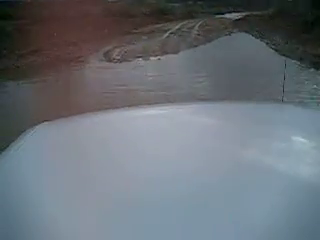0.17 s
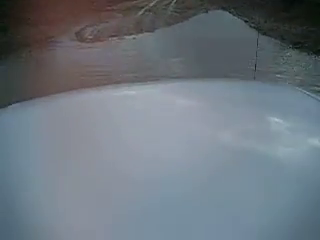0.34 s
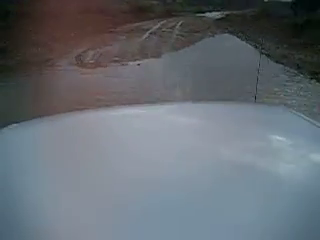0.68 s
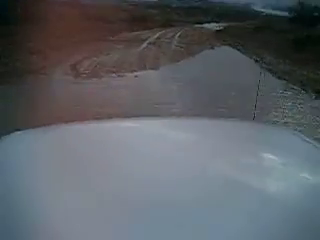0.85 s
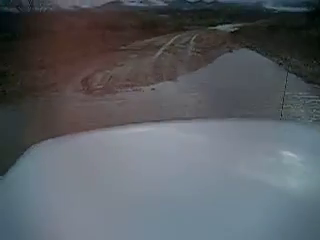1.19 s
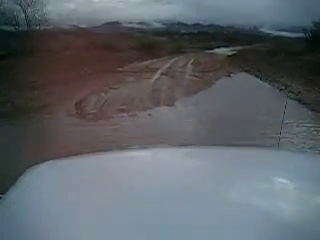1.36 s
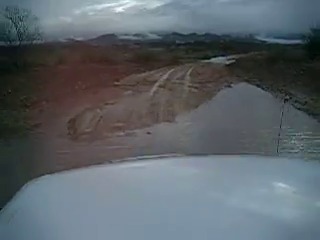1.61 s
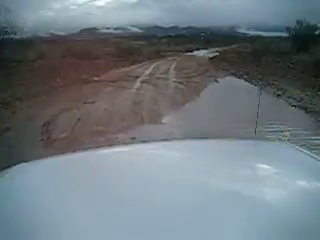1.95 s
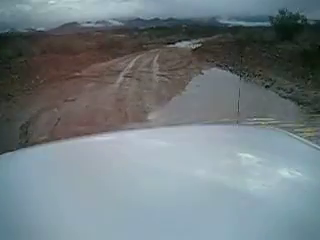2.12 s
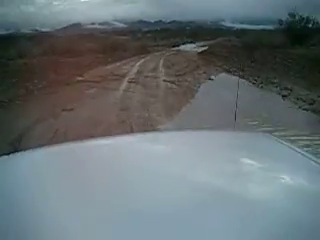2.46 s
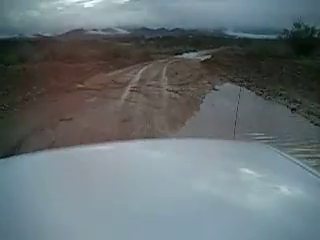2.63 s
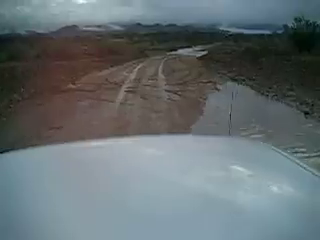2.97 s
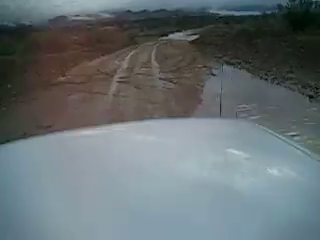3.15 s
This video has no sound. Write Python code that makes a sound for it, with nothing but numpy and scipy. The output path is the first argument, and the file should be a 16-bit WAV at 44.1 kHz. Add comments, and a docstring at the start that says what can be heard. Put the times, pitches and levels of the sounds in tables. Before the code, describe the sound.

Low, lumpy truck engine drone over bassy rumble, water swirling and gurgling, dull knocks from below.

```python
"""In a muddy creek, an eight-cylinder engine pulls a truck slowly, heard on the cab by a narrow-band camera microphone.
Uneven exhaust orders, sinusoids locked to the engine cycle, drone over a low rumble of shaped noise.
Water rushes, slaps and thumps as shaped noise and gurgles as rising bubbles; decaying sines thud over stones.
The gain ducks just after loud thuds, and the signal jumps once, with a sharp click."""
import sys
import numpy as np
from scipy import signal
from scipy.io import wavfile
from scipy.ndimage import uniform_filter1d

SR = 44100
rng = np.random.default_rng(int(sys.argv[2]) if len(sys.argv) > 2 else 0)


def store_pcm(level_fs):
    """Save levels as 16-bit WAV."""
    pcm = np.round(np.clip(level_fs, -1, 1) * 32767).astype(np.int16)
    wavfile.write(sys.argv[1], SR, np.atleast_2d(pcm).T)


def voltage_ratio(decibels):
    """Convert decibels (scalar or array-like) to amplitude ratios, 20 dB per decade."""
    exponent = np.asarray(decibels, float) / 20
    return 10 ** exponent


N = 145530  # samples, 3.3 s


def evened(x):
    """Normalization: scales a signal to an rms of 1."""
    return x / np.sqrt(np.mean(x ** 2) + 1e-20)


def curve(table, column=1):
    """Linear interpolation: draws one column of a table, timed in seconds, at every sample."""
    rows = np.array(table, float)
    return np.interp(np.arange(N) / SR, rows[:, 0], rows[:, column])


def add(mix, start_s, sound):
    """Superposition: adds a sound to the mix in place, cut off at the end."""
    part = mix[round(start_s * SR):][:len(sound)]
    part += sound[:len(part)]


def slow(top_hz):
    """Random-phase sum: sines over a decade of frequency make a slow chance wave of rms 1."""
    t = np.arange(0, N + 64, 64) / SR
    wave = np.zeros(len(t))
    for hz in np.geomspace(top_hz / 10, top_hz, 20):
        wave += np.sin(2 * np.pi * (hz * t + rng.random())) / np.sqrt(hz)
    return np.interp(np.arange(N) / SR, t, evened(wave))


def noise(spectrum, size, patchy_db, flicker_db):
    """Short-time spectral synthesis: random spectra with patches and a flicker shared by wide bands, rms 1."""
    frames, hz = 4 * N // size + 5, np.fft.rfftfreq(size, 1 / SR)
    real, imaginary, patches, flicker = rng.standard_normal((frames, len(hz), 4)).T
    # smooth each over frequency bins, then over frames
    patches = evened(uniform_filter1d(uniform_filter1d(patches, 8, 0), 10, 1))
    flicker = evened(uniform_filter1d(uniform_filter1d(flicker, 40, 0), 3, 1))
    table_hz, table_db = np.transpose(spectrum)
    shape_db = np.interp(np.log(hz + 1), np.log(table_hz + 1), table_db)[:, None]
    level_db = shape_db + patchy_db * patches + flicker_db * flicker
    spectra = (real + 1j * imaginary) * voltage_ratio(level_db)
    return evened(signal.istft(spectra, nperseg=size, noverlap=3 * size // 4)[1][:N])


# Speed of the engine. Each row: time in seconds, engine cycles per second.
ENGINE_SPEED = [(0, 12), (.27, 12.26), (.55, 12.55), (.85, 12.3), (1.1, 11.57), (1.35, 12.53), (1.5, 11.75),
                (1.66, 12.26), (1.9, 12.63), (2.1, 12.2), (2.4, 12.2), (2.8, 12.5), (3.1, 13.3),
                (3.3, 12.8)]
# Harmonic orders of the engine. Each row: multiple of the engine cycle, rms level in dB before effort.
ENGINE_ORDERS = [(3, -34), (5, -21.5), (8, -31), (10, -36.5), (11, -32), (13, -23), (14, -38), (15, -37),
                 (16, -41), (21, -44), (23, -37), (24, -39), (26, -42), (28, -46.5), (31, -48.5)]
# Swings of engine effort. Each row: time in seconds, gain of low orders in dB, gain of high orders in dB.
ENGINE_EFFORT = [(0, 6, -5.5), (.3, -3.5, -4.5), (.6, -2, 1), (.9, -1.5, -1), (1.08, -1, -3),
                 (1.2, 1.5, -1), (1.5, -1, -2.5), (1.8, 1.5, 2), (2.1, 1, -1.5), (2.4, -1.5, 0),
                 (2.7, -4, 0), (3.0, -3.5, -0.5), (3.3, 0, 0.5)]


def engine():
    """Harmonic orders: sinusoids locked to the firing cycle, each wavering a little in level and phase."""
    last_low_order = 9
    waver_db, drift_turns, waver_hz = 1.3, .04, 7  # rms, rms, fastest
    turns = np.cumsum(curve(ENGINE_SPEED)) / SR
    out = np.zeros(N)
    for order, order_db in ENGINE_ORDERS:
        order = round(order)
        effort_db = curve(ENGINE_EFFORT, column=2 if order > last_low_order else 1)
        phase = order * turns + drift_turns * slow(waver_hz)
        level_db = order_db + effort_db + waver_db * slow(waver_hz)
        out += np.sqrt(2) * voltage_ratio(level_db) * np.cos(2 * np.pi * phase)
    return out


# Spectrum of the rumble. Each row: frequency in Hz, relative density in dB per Hz.
RUMBLE_SPECTRUM = [(2, -24.5), (6, -6.5), (30, -4.5), (50, 5.5), (70, -2), (90, -8.5), (120, -4),
                   (170, -5.5), (215, -13.5), (290, -12), (450, -25.5), (600, -48.5), (1000, -100)]
# Swell of the rumble. Each row: time in seconds, gain in dB.
RUMBLE_SWELL = [(0, 0), (.4, 3), (.7, -0.5), (1.1, -2.5), (1.5, -1), (1.9, -3.5), (2.3, 2.5), (2.7, -2),
                (3.3, 0.5)]


def rumble():
    """Broadband excitation: body, tyres and wind shake the low end as shaped noise."""
    base_db = -20
    shaking = noise(RUMBLE_SPECTRUM, size=2048, patchy_db=.3, flicker_db=.3)
    return voltage_ratio(base_db + curve(RUMBLE_SWELL)) * shaking


# Knocks and thuds through the chassis.
# Each row: start in seconds, level in dB at the start of the decay, pitch in Hz, 60 dB decay time in seconds.
CHASSIS_THUDS = [(.102, -11.5, 343, 0.046), (.325, -14.5, 541, 0.043), (.346, -19, 488, .05),
                 (0.439, -16.5, 536, 0.053), (.461, -5, 75, 0.064), (0.551, -16, 520.1, .05),
                 (1.047, -5, 70, 0.11), (1.263, -5.5, 90.6, 0.072), (2.598, -4, 71.6, .1),
                 (2.808, -5.5, 186.7, 0.081), (2.812, -7, 283, .1), (2.831, -7.5, 48.6, 0.12),
                 (2.893, -29, 756, 0.17), (3.105, -8.5, 54.4, .1)]


def thud(start_s, db, hz, t60_s):
    """Damped resonance: a chassis knock rings at one pitch, decays evenly in dB and starts softly."""
    t = np.arange(8000) / SR
    rise = np.minimum(t * hz, 1)  # lasts one cycle
    decay = voltage_ratio(db - 60 * t / t60_s)
    return start_s, -decay * rise * np.sin(2 * np.pi * hz * t)


# Spectrum of the rushing water. Each row: frequency in Hz, relative density in dB per Hz.
RUSH_SPECTRUM = [(180, -34), (300, 0), (363, -9), (540, -10), (669, -12.5), (877, -15.5), (939, -15.5),
                 (1140, -15), (3250, -24), (3760, -26.5), (4460, -50.5), (5800, -80.5), (9810, -120)]
# Strength of the rushing water. Each row: time in seconds, level in dB.
RUSH_STRENGTH = [(0, -32.5), (.1, -31.5), (.3, -32), (.6, -36), (.8, -34.5), (1.1, -35), (1.5, -33),
                 (1.9, -34.5), (2.3, -33), (2.5, -34), (2.6, -33), (3, -35), (3.3, -32.5)]


def rush():
    """Turbulent flow: water streaming past wheels and sills is shaped noise with a moving level."""
    return voltage_ratio(curve(RUSH_STRENGTH)) * noise(RUSH_SPECTRUM, size=512, patchy_db=0.6, flicker_db=0.24)


# Water slapping the body.
# Each row: start in seconds, noise level in dB before the envelope, length in seconds, top frequency in Hz.
WATER_SLAPS = [(.04, -35.5, .12, 2000), (.22, -30.5, 0.04, 680), (0.403, -29.5, 0.048, 1800),
               (0.531, -28, 0.023, 710), (0.754, -33.5, .05, 1200), (1.26, -32, 0.026, 701),
               (1.361, -31.5, .03, 2260), (2.261, -29, 0.049, 760), (2.892, -36, 0.011, 1200)]


def slap(start_s, db, length_s, top_hz):
    """Transient turbulence: a burst of band-limited water noise rises fast and falls as a Gaussian."""
    low_hz, rise_s = 366, 0.005
    t = np.arange(12000) / SR
    low_cut = signal.butter(2, low_hz, "high", fs=SR, output="sos")
    high_cut = signal.butter(4, top_hz, fs=SR, output="sos")
    splash = signal.sosfilt(np.vstack([low_cut, high_cut]), rng.standard_normal(len(t)))
    envelope = (1 - np.exp(-t / rise_s)) * np.exp(-(t / length_s) ** 2)
    return start_s, voltage_ratio(db) * envelope * evened(splash)


# Spectrum of the water thumps. Each row: frequency in Hz, relative density in dB per Hz.
BUFFET_SPECTRUM = [(60, -34), (150, -5.5), (300, 0.5), (600, -7), (1200, -14.5), (2500, -28), (5000, -58)]


def buffet():
    """Amplitude modulation: water thumps under the floor as noise in quick uneven lumps."""
    level_db, lump_db, lump_hz = -34, 3.0, 50  # rms level, rms swing, fastest swing
    lumps = voltage_ratio(lump_db * slow(lump_hz))
    thumps = noise(BUFFET_SPECTRUM, size=1024, patchy_db=1.5, flicker_db=1.5)
    return voltage_ratio(level_db) * evened(lumps * thumps)


def gurgle():
    """Bubble resonance: short rising tones of many sizes start at random, the higher the fainter."""
    level_db, bubbles_per_s, spread_db = -40, 300, 2.5
    starts = rng.random(N) < bubbles_per_s / SR
    strength = voltage_ratio(spread_db * np.minimum(rng.exponential(1, N), 5)) * starts
    pitches_hz = np.geomspace(250, 1600, 24)
    which = rng.integers(0, len(pitches_hz), N)
    out = np.zeros(N)
    for k, hz in enumerate(pitches_hz):
        life = np.arange(0, 1, hz / SR / 5.2)  # 0 to 1 over 5.2 periods of the nominal pitch
        rising_tone = np.sin(2 * np.pi * 5.04 * life * (1 + 0.16 * life))
        bubble = rising_tone * life ** 0.53 * (1 - life) ** 2
        out += signal.oaconvolve(strength * (which == k), bubble * 250 / hz)[:N]
    return voltage_ratio(level_db) * evened(out)


def scene():
    """Superposition: the steady sources sum, then slaps and thuds join at their times."""
    mix = engine() + rumble() + rush() + gurgle() + buffet()
    for row in WATER_SLAPS:
        add(mix, *slap(*row))
    for row in CHASSIS_THUDS:
        add(mix, *thud(*row))
    return mix[None]


def gain_control(dry):
    """Feed-forward compression: the held power turns the gain down just after loud thuds."""
    threshold_db, share, lag_s, recover_db_per_s = -13, .8, .015, 120
    t = np.arange(N) / SR
    power_db = 10 * np.log10(abs(uniform_filter1d(dry[0] ** 2, size=700)) + 1e-12)
    recovery_db = recover_db_per_s * t
    held_db = np.maximum.accumulate(power_db + recovery_db) - recovery_db  # peaks fall back steadily
    over_db = uniform_filter1d(np.maximum(held_db - threshold_db, 0), size=300)
    late_over_db = np.interp(t - lag_s, t, over_db)
    return dry / voltage_ratio(share * late_over_db)


def band_limit(x):
    """Linear-phase filtering: a steep low-pass leaves the narrow band of the microphone."""
    edge_hz = 4420
    lowpass = signal.firwin(511, edge_hz, window=("kaiser", 11), fs=SR)
    return signal.oaconvolve(x, lowpass[None], "same")


def signal_jump():
    """Step discontinuity: a sudden leap from below zero to above it clicks, fading on both sides."""
    jump_s, height_db, decay_s = 2.0208, -11, .0015
    from_jump = np.arange(N) / SR - jump_s
    return voltage_ratio(height_db) / 2 * np.sign(from_jump) * np.exp(-abs(from_jump) / decay_s)


def roll_off(x):
    """The treble ends steeply here."""
    return signal.sosfilt(signal.butter(12, 16300, fs=SR, output="sos"), x)


def record(dry):
    """Signal chain: gain control, then a narrow band limit, then one sudden step in the signal."""
    narrow = band_limit(gain_control(dry))
    mix = narrow + signal_jump()
    return roll_off(mix)


dry = scene()
out = record(dry)
store_pcm(out)
```